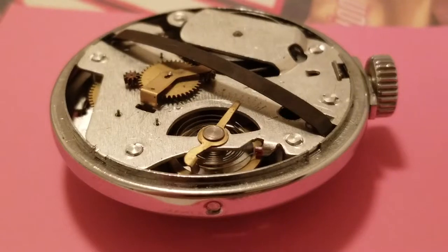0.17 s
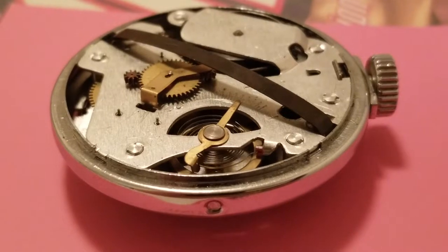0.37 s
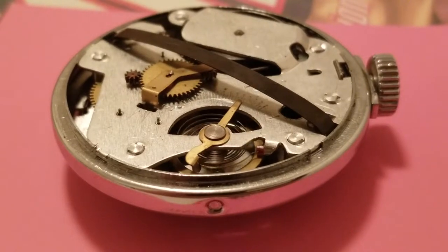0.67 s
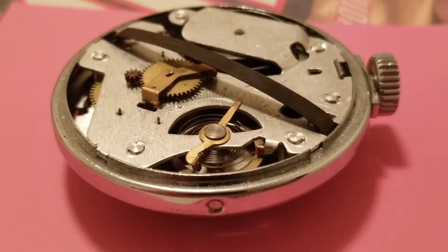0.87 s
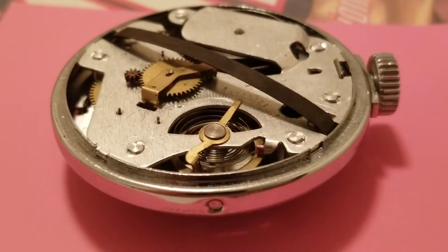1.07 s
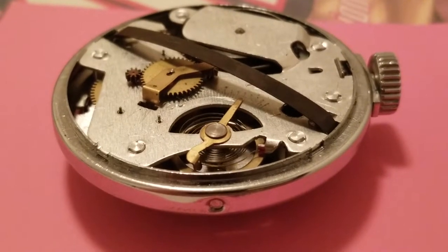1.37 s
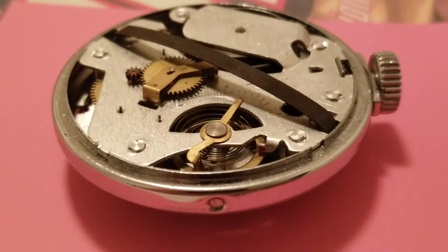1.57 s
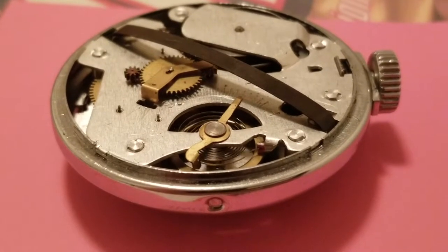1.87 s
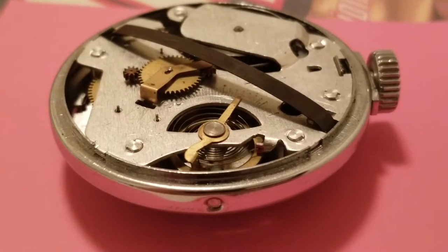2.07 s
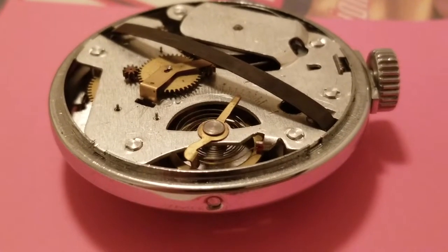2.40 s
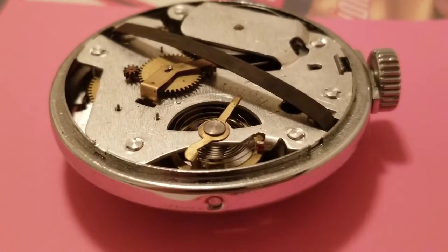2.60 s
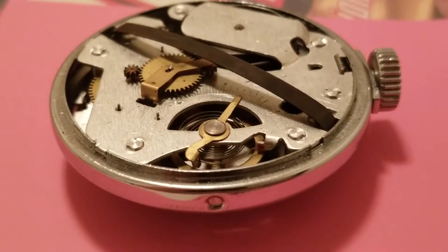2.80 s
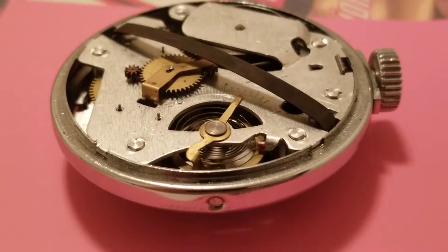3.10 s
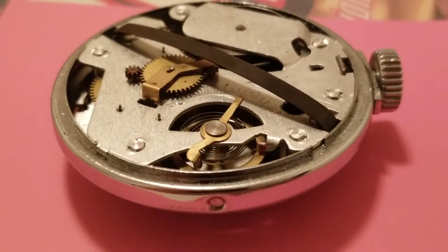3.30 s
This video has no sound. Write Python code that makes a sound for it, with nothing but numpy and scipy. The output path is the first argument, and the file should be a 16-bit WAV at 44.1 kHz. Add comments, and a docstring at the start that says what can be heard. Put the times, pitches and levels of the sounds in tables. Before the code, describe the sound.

Crisp ticking of a mechanical pocket watch runs throughout, close and to the left, with a slight metallic ring and rattle. Soft handling thumps sound on the right, mostly in the first half, in a quiet room.

```python
"""Over faint room rumble and hiss, an open pocket watch is already running close to the left microphone.
Four times a second the escapement unlocks, a tooth slides along a pallet and drops onto it;
the two pallets sound tick and tock. Steel parts shimmer on and a loose part rattles between beats.
From 0.2 to 2.7 s, handling bumps reach mostly the right microphone.
Near 0.44 and 2.95 s the sliding tooth catches with a sharper click."""
import sys
import numpy as np
from scipy import signal
from scipy.fft import rfft, irfft, next_fast_len
from scipy.io import wavfile
from scipy.ndimage import map_coordinates

SR = 44100
rng = np.random.default_rng(int(sys.argv[2]) if len(sys.argv) > 2 else 0)


def wrap_up_sound(samples):
    """Save the sound to the file named by the first command line argument, as 16-bit audio."""
    columns = np.atleast_2d(samples).T
    # keep every value between -1 and 1, then stretch to whole-number steps
    tamed = np.clip(columns, -1, 1)
    steps = np.round(tamed * 32767).astype(np.int16)
    wavfile.write(sys.argv[1], SR, steps)


N = 152145
FFT_SIZE = next_fast_len(N + SR)
HZ = np.fft.rfftfreq(FFT_SIZE, 1 / SR)
WATCH_PAN_DB, BUMP_PAN_DB = 16.5, -15.5  # left minus right
SCATTER_DB = 1.6  # contact level spread, beat to beat

# Drops onto the first (tick) and second (tock) pallet. Each row: time in seconds, gain in dB.
TICK_BEATS = [(0.2051, -1.5), (0.7063, -1), (1.205, -0.5), (1.706, -2), (2.2048, -1.5), (2.7042, -0.5),
              (3.2035, 0)]
TOCK_BEATS = [(-.04, 6.5), (0.4607, 0.35), (.961, 0.7), (1.46, 0.3), (1.9595, 0.3), (2.4582, 1.35),
              (2.9572, 2.05), (3.458, 0.2)]


def amp(db):
    """Gain of a level in dB."""
    return 10 ** (np.asarray(db) / 20)


def unit_rms(x):
    """Scale to rms 1."""
    return x / np.sqrt(np.mean(np.abs(x) ** 2) + 1e-30)


def curve(points, hz):
    """Interpolate (Hz, value) points on a log frequency axis."""
    knots_hz, values = np.transpose(points)
    return np.interp(np.log(hz + 1), np.log(knots_hz + 1), values)


def pan(db):
    """Left and right gains; the louder side is 1."""
    return amp([[min(db, 0)], [min(-db, 0)]])


def add(track, start_s, x):
    """Mix x into the track, cut to its bounds."""
    i = round(start_s * SR)
    a, b = max(i, 0), min(i + x.shape[-1], N)
    if b > a:
        track[..., a:b] += x[..., a - i:b - i]


def filtered(x, response):
    """Apply a response on the HZ grid."""
    return irfft(rfft(x, FFT_SIZE) * response, FFT_SIZE)[..., :N]


def body(spectrum, size=2048):
    """Minimum-phase impulse response of energy 1 from (Hz, dB) points."""
    cepstrum = irfft(np.log(amp(curve(spectrum, np.fft.rfftfreq(size, 1 / SR)))))
    cepstrum[1:size // 2] *= 2
    cepstrum[size // 2 + 1:] = 0
    ring = irfft(np.exp(rfft(cepstrum)))
    return ring / np.linalg.norm(ring)


def strike(ring, click_db, scrape_db, decay_s, rise_s=0.0008):
    """A clean click and a brief scrape, both ringing the same body."""
    t = np.arange(SR // 40) / SR
    grit = rng.standard_normal(len(t)) * np.exp(-t / decay_s) * (1 - np.exp(-t / rise_s))
    click = np.pad(ring, (0, len(t) - 1))
    scrape = signal.fftconvolve(grit, ring)
    scrape -= click * (scrape @ click)  # orthogonal, so energies add
    return amp(click_db) * click + amp(scrape_db) * scrape / np.linalg.norm(scrape)


def room_rumble(level_db=-52, pan_db=-15, diffuse_db=-11.5, wander_db=2.5, wander_hz=6.8):
    """Low room noise of wandering level, stronger on the right."""
    # Each row: frequency in Hz, relative level in dB.
    spectrum = [(12, -26), (20, -3), (43, -5.5), (59, -3.5), (98, 0.5), (280, -20), (498, -37),
                (566, -34.5), (619, -41), (1500, -43), (1950, -69.5), (3300, -120)]
    knots = rng.standard_normal(int(N * wander_hz / SR) + 4)
    swell = amp(wander_db * map_coordinates(knots, [np.arange(N) * wander_hz / SR]))
    colour = amp(curve(spectrum, HZ)) / (1 + (HZ / 900) ** 4)
    low = unit_rms(swell * filtered(rng.standard_normal((3, N)), colour))
    return amp(level_db) * (pan(pan_db) * low[0] + amp(diffuse_db) * low[1:])


def microphone_hiss(level_db=-72, pan_db=0.5, whine_hz=14000, half_width_hz=220, whine_db=-5.5):
    """Steady hiss with a faint high whine."""
    # Each row: frequency in Hz, relative level in dB.
    spectrum = [(290, -36), (500, -1), (1610, -2.5), (2490, -3.5), (3890, -7), (4500, -4.5), (4970, -6.5),
                (13700, -6.5), (15800, -5)]
    whine = 1 + amp(whine_db) / (1 + ((HZ - whine_hz) / half_width_hz) ** 2)
    hiss = filtered(rng.standard_normal((2, N)), amp(curve(spectrum, HZ)) * whine)
    return amp(level_db) * pan(pan_db) * unit_rms(hiss)


def lead_in(beats, contacts, spectrum, jitter_s=0.0007):
    """Quiet unlocking and sliding contacts before each drop."""
    out, ring = np.zeros(N), body(spectrum)
    for drop_s, db in beats:
        for offset_s, click_db, scrape_db, decay_s in contacts:
            start_s = drop_s + offset_s + jitter_s * rng.normal()
            gain = amp(db + SCATTER_DB * rng.normal())
            add(out, start_s, gain * strike(ring, click_db, scrape_db, decay_s))
    return out


def drops(beats, contacts, spectrum, offset_spread=0.12):
    """A tooth lands on a pallet and rebounds; contacts around the main hit vary in time and level."""
    out, ring = np.zeros(N), body(spectrum)
    for drop_s, db in beats:
        for offset_s, click_db, scrape_db, decay_s in contacts:
            gain = amp(db + SCATTER_DB * rng.normal() * (offset_s != 0))
            start_s = drop_s + offset_s * (1 + offset_spread * rng.normal())
            add(out, start_s, gain * strike(ring, click_db, scrape_db, decay_s))
    return out


def escapement():
    """The escape wheel unlocks, slides and drops on each pallet in turn, ringing the movement."""
    # Contacts. Each row: offset from the drop in seconds, click in dB, scrape in dB, decay in seconds.
    tick_lead = [(-.0505, -37.5, -35.5, .004), (-.0445, -40, -29, .002), (-.0175, -33, -25, 0.0043),
                 (-.0115, -40, -29.5, 0.004)]
    tick_drop = [(-.0007, -13, -16.5, 0.00083), (0, 3, -8.5, .001), (.0009, -12.5, -10.5, 0.0011),
                 (.004, -8, -12, .0008)]
    tock_unlock = [(-.052, -41.5, -48.5, 0.0011), (-.0505, -27.5, -28.5, 0.0027)]
    tock_lead = [(-.0515, -42, -39, .002), (-.037, -44, -33.5, 0.0062), (-.019, -24, -24.5, .0016),
                 (-.0148, -19, -18.5, .002), (-.0108, -23.5, -26.5, 0.0034)]
    tock_drop = [(-.0007, -18, -20, .0004), (0, -2, -14, .001), (.0016, -11, -10, .0016),
                 (.0053, -14, -16, .0012)]
    # Response of the movement to slides and drops. Each row: frequency in Hz, relative level in dB.
    tick_slide = [(1500, -43), (2900, -14), (3800, 7), (4700, -11.5), (5700, 2), (7300, -20), (8700, -31),
                  (10500, -18), (15000, -24)]
    tick_body = [(1200, -59.5), (1800, -51.5), (2250, -24), (3050, -27), (3400, -15.5), (3600, -18.5),
                 (4000, -16), (4400, -26.5), (4750, -15.5), (4920, 0.5), (5300, 0.5), (5520, -9),
                 (6000, -6), (6550, -14.5), (7200, -10.5), (7700, -16), (8050, -29), (9000, -35.5),
                 (10300, -18.5), (11100, -36.5), (11800, -26.5), (12300, -49), (13000, -27.5),
                 (14300, -49.5), (16000, -42)]
    tock_slide = [(1500, -36.5), (2900, -5.5), (4000, -11), (5200, 0), (6300, -17.5), (7300, -8.5),
                  (8700, -21), (10500, -16.5), (15000, -47.5)]
    tock_body = [(1200, -54), (1800, -49.5), (2250, -20), (3000, -25.5), (3700, -10), (4400, -11.5),
                 (4800, 3), (5020, -7.5), (5250, -3.5), (6200, -10.5), (7300, -14.5), (8300, -19),
                 (9000, -31), (10100, -25.5), (11200, -31), (12350, -40), (12900, -25), (14200, -50),
                 (16000, -46)]
    tick = lead_in(TICK_BEATS, tick_lead, tick_slide)
    tick += drops(TICK_BEATS, tick_drop, tick_body)
    tock = lead_in(TOCK_BEATS, tock_unlock, tick_body)  # leaving the first pallet rings it lightly
    tock += lead_in(TOCK_BEATS, tock_lead, tock_slide)
    tock += drops(TOCK_BEATS, tock_drop, tock_body)
    return tick + tock + tooth_catches(tock_slide)


def steel_shimmer(modes=24):
    """Clusters of close steel modes ring on after each drop."""
    # Each row: centre in Hz, half-width in Hz, dB after a tick, dB after a tock, T60 in seconds.
    clusters = [(5380, 380, -25.5, -35.5, .18), (4680, 300, -39, -31.5, .15), (3440, 110, -26, -37, .16),
                (2910, 45, -33, -35, .3), (7100, 600, -35, -34, .2), (11500, 3200, -35, -35, .3)]
    out, t = np.zeros(N), np.arange(SR // 5) / SR
    for pallet, beats in enumerate([TICK_BEATS, TOCK_BEATS]):
        for drop_s, db in beats:
            for centre_hz, half_width_hz, tick_db, tock_db, t60_s in clusters:
                spread, phase = rng.random((2, modes))
                modes_hz = centre_hz + half_width_hz * (2 * (np.arange(modes) + spread) / modes - 1)
                lines = np.zeros(len(t) // 2 + 1, complex)
                lines[(modes_hz * len(t) / SR).astype(int)] = np.exp(2j * np.pi * phase)
                ring = irfft(lines, len(t)) * amp(-60 * t / t60_s)
                add(out, drop_s, amp(db + (tick_db, tock_db)[pallet]) * ring / np.linalg.norm(ring))
    return out


def watch_room(watch, left_db=-22.5, right_db=-33.5, near_db=-25, near_t60_s=0.05, delay_s=0.0015):
    """Near reflections from the table and a faint room tail, slightly different for each beat."""
    # Each row: frequency in Hz, T60 in seconds.
    decay_times = [(500, .3), (2500, 0.49), (6000, 0.21), (9000, 0.073), (15000, .15)]
    out, t = np.zeros((2, N)), np.arange(SR // 3) / SR
    beats_s = np.sort([drop_s for drop_s, _ in TICK_BEATS + TOCK_BEATS])
    midpoints_s = (beats_s[1:] + beats_s[:-1]) / 2
    edges = [0, *(midpoints_s * SR).astype(int), N]
    for a, b in zip(edges, edges[1:]):
        hz, frames_s, noise = signal.stft(rng.standard_normal((2, len(t))), SR, nperseg=256)
        decay = amp(-60 * frames_s / curve(decay_times, hz)[:, None])
        tail = signal.istft(noise * decay, SR, nperseg=256)[1][:, :len(t)]
        near = rng.standard_normal((2, len(t))) * amp(-60 * t / near_t60_s)
        response = amp([[left_db], [right_db]]) * unit_rms(tail)
        response += amp(near_db) * pan(WATCH_PAN_DB) * unit_rms(near)
        reflected = signal.fftconvolve(watch[None, a:b], response / np.sqrt(len(t)), axes=1)
        add(out, a / SR + delay_s, reflected)
    return out


def rattle(gain_db=-17):
    """Light, duller knocks of a loose part between the drops."""
    # Each row: start in seconds, relative level in dB.
    knocks = [(0.019, -5), (0.036, -10), (.202, -3), (.229, -1.5), (.264, -10), (0.428, -1), (0.443, 3.5),
              (.453, 0.5), (0.495, -1), (.524, -6), (.538, -13), (0.687, -9), (0.731, -5.5), (0.76, -9),
              (0.924, -3), (.946, 4.5), (0.993, -4.5), (1.03, -5.5), (1.178, -7), (1.195, -1.5),
              (1.210, -4.5), (1.239, -5), (1.288, -6), (1.299, -6), (1.425, -1), (1.445, 4), (1.492, -3),
              (1.521, -8.5), (1.532, -11.5), (1.731, -7.5), (1.764, -7.5), (1.92, -3.5), (1.942, 7.5),
              (1.976, -3), (2.02, -13), (2.19, -10), (2.195, -2), (2.22, -5.5), (2.254, -9), (2.423, -3),
              (2.444, 6), (2.472, -2.5), (2.697, -10), (2.720, -4), (2.755, -7), (2.778, -13.5),
              (2.923, -1), (2.942, 4.5), (3.021, -2.5), (3.047, -6), (3.061, -11.5), (3.192, -1),
              (3.212, 0.5), (3.255, -10), (3.283, -10.5), (3.426, -3.5), (3.444, 3)]
    # Each row: frequency in Hz, relative level in dB.
    spectrum = [(1600, -54), (2050, -25), (2450, 1), (2600, 1), (2830, -8), (3100, -19), (3700, -19),
                (4200, -30), (4850, -22), (6000, -30), (7000, -19), (8700, -37), (15000, -48)]
    out, ring = np.zeros(N), body(spectrum)
    for start_s, db in knocks:
        add(out, start_s, amp(gain_db + db) * strike(ring, click_db=-4.5, scrape_db=-6, decay_s=0.00071))
    return out


def handling_bumps(thump_q=0.89, holder_hz=76, holder_t60_s=0.15, holder_db=-11.5, size=8192):
    """Heavily damped thumps, hollower when hard; the microphone holder shakes on after each."""
    # Each row: start in seconds, thump peak in dB, pitch in Hz, contact hardness as a cutoff in Hz.
    bumps = [(0.2253, -14, 199, 1400), (0.379, -26.5, 141, 490), (.415, -27, 246, 1700),
             (1.0543, -26.5, 137, 420), (1.125, -45.5, 170, 450), (1.2494, -24.5, 246.7, 1200),
             (1.309, -23, 151, 500), (1.3159, -23, 231, 750), (1.5986, -36, 176, 620),
             (1.652, -45.5, 200, 440), (1.905, -29.5, 110, 220), (2.685, -33, 100, 260)]
    # Each row: frequency in Hz, relative level in dB.
    spectrum = [(25, 8.5), (60, 14), (130, 3.5), (350, 2), (560, 0.5), (900, 1), (1700, 4), (2600, 14),
                (5000, -18.5)]
    dip_hz, dip_q, full_dip_hardness_hz = 513, 2.4, 1300
    out, hz, t = np.zeros(N), np.fft.rfftfreq(size, 1 / SR), np.arange(size) / SR
    shake_envelope = amp(holder_db - 60 * t / holder_t60_s) * (1 - np.exp(-t * holder_hz))
    shake = np.sin(2 * np.pi * holder_hz * t) * shake_envelope
    colour = rfft(body(spectrum, size))
    s_dip = 1j * hz / dip_hz
    dip = s_dip / dip_q / (1 + s_dip / dip_q + s_dip ** 2)
    for start_s, db, pitch_hz, hardness_hz in bumps:
        s_pitch, s_hard = 1j * hz / pitch_hz, 1j * hz / hardness_hz
        resonance = (s_pitch / (1 + s_pitch / thump_q + s_pitch ** 2)) ** 2
        lowpass = 1 / ((1 + s_hard) * (1 + s_hard + s_hard ** 2))
        hollow = 1 - min(hardness_hz / full_dip_hardness_hz, 1) ** 2 * dip
        thump = irfft(colour * hollow * resonance * lowpass)
        add(out, start_s, amp(db) * (shake - thump / np.abs(thump).max()))
    return out


def bump_room(bumps, gain_db=-6, t60_s=0.12, highpass_hz=900):
    """The room answers the bumps faintly, mostly above their bass."""
    t = np.arange(SR // 3) / SR
    tail = unit_rms(rng.standard_normal((2, len(t))) * amp(-60 * t / t60_s)) / np.sqrt(len(t))
    radiated = filtered(bumps, 1j * HZ / (highpass_hz + 1j * HZ))
    return amp(gain_db) * signal.fftconvolve(radiated[None], tail, axes=1)[:, :N]


def tooth_catches(spectrum):
    """The sliding tooth catches with a sharper click before two of the tocks."""
    # Each row: start in seconds, scrape level in dB.
    catches = [(0.4383, -29), (0.4452, -19), (2.948, -17.5)]
    out, ring = np.zeros(N), body(spectrum)
    for start_s, db in catches:
        add(out, start_s, strike(ring, click_db=db - 6, scrape_db=db, decay_s=0.0027))
    return out


def scene():
    """Watch on the left, bumps on the right, over rumble and hiss."""
    watch = escapement() + steel_shimmer() + rattle()
    bumps = handling_bumps()
    watch_stereo = pan(WATCH_PAN_DB) * watch + watch_room(watch)
    bumps_stereo = pan(BUMP_PAN_DB) * (bumps + bump_room(bumps))
    return watch_stereo + bumps_stereo + room_rumble() + microphone_hiss()


def record(dry):
    """Steep low-pass at the recorder's band limit."""
    cutoff_hz = 16300
    return filtered(dry, 1 / (1 + (HZ / cutoff_hz) ** 120))


dry = scene()
out = record(dry)
wrap_up_sound(out)
```